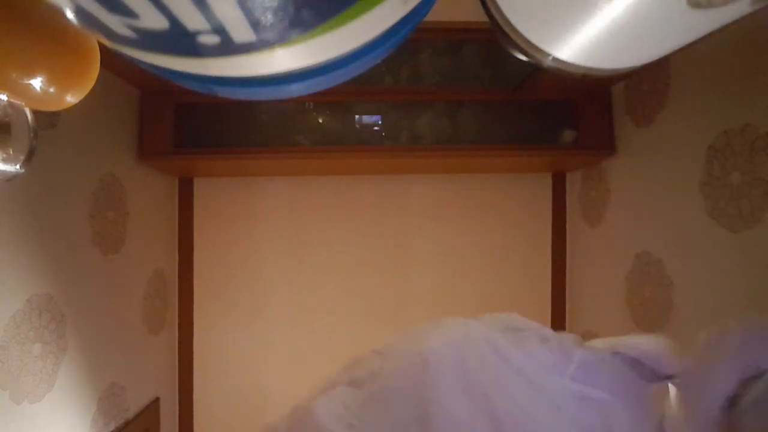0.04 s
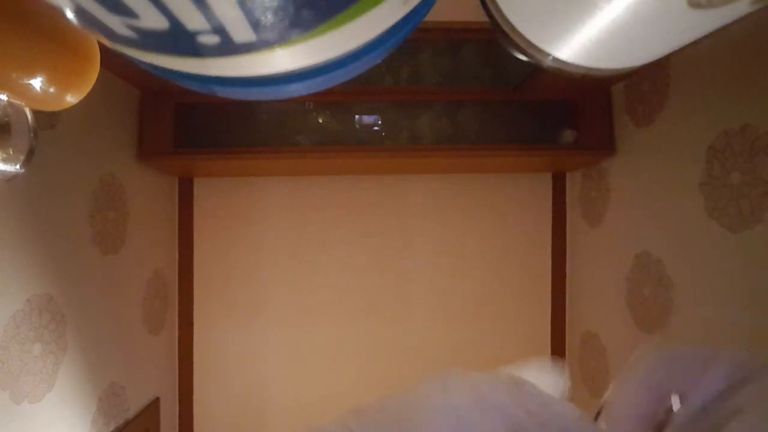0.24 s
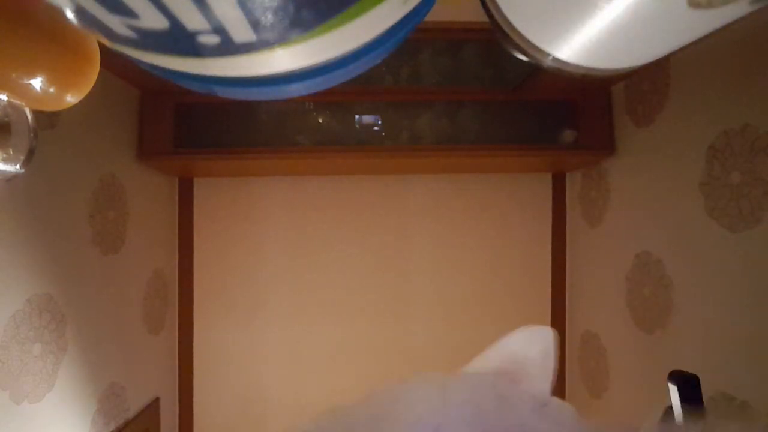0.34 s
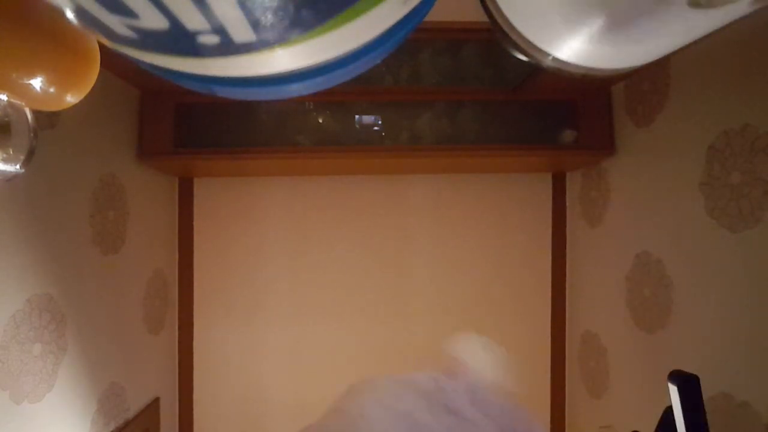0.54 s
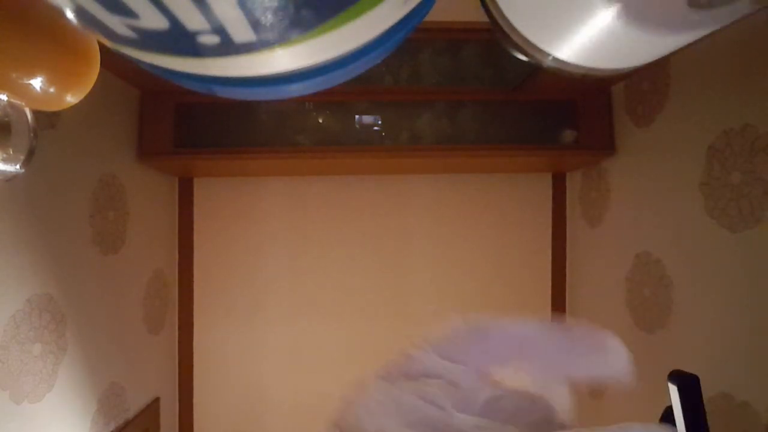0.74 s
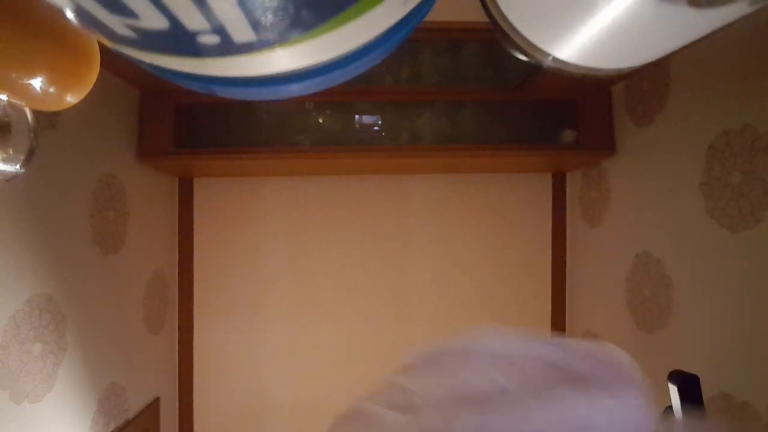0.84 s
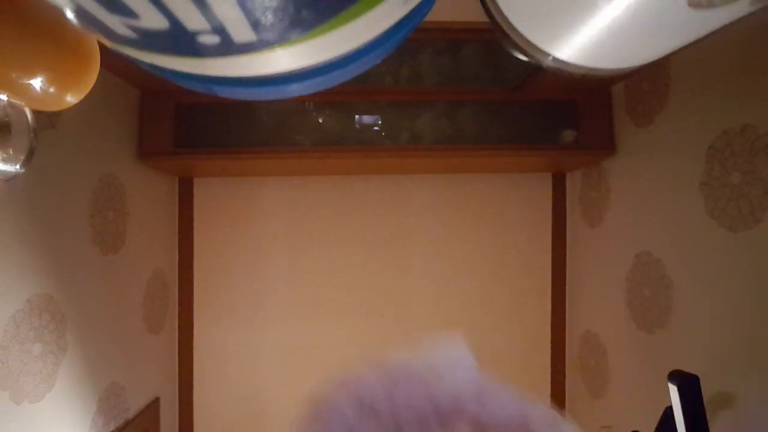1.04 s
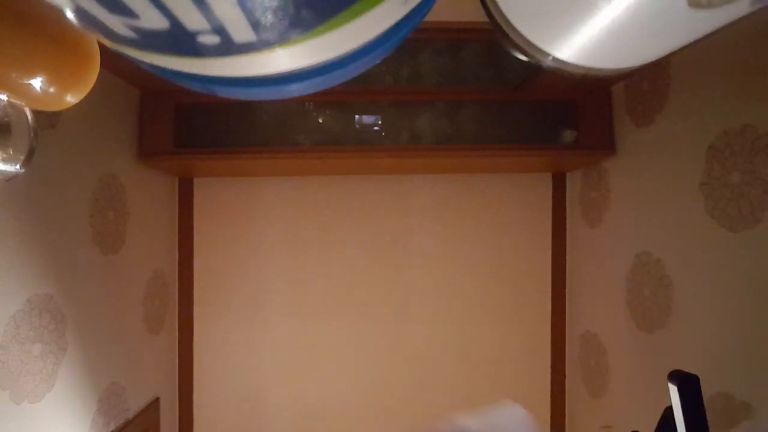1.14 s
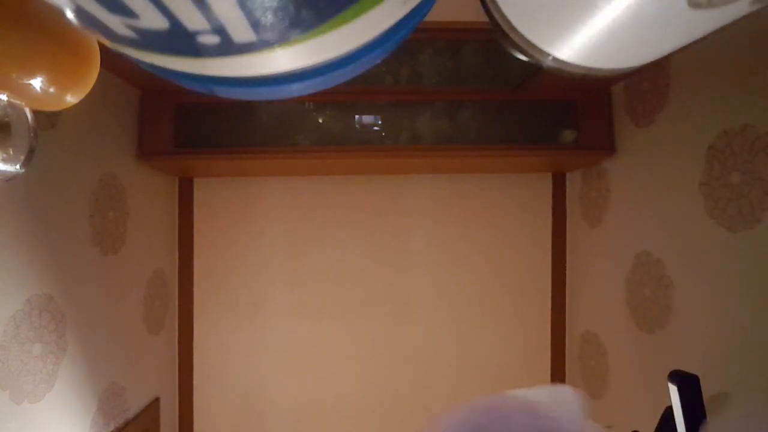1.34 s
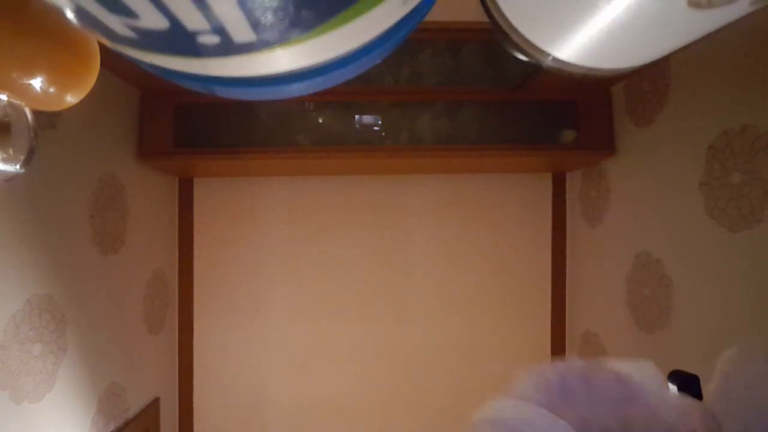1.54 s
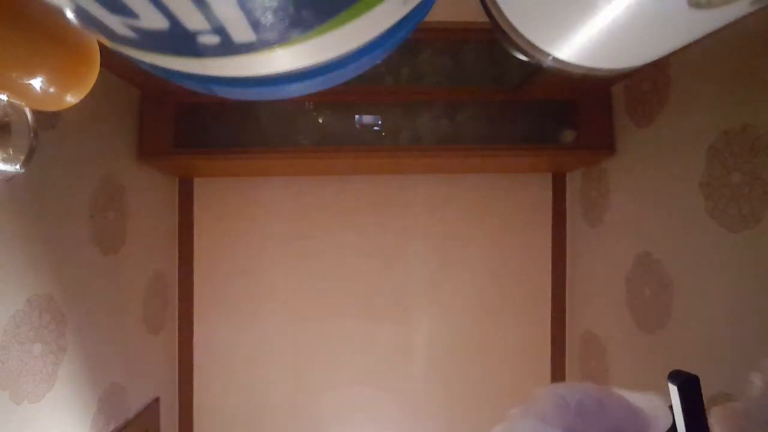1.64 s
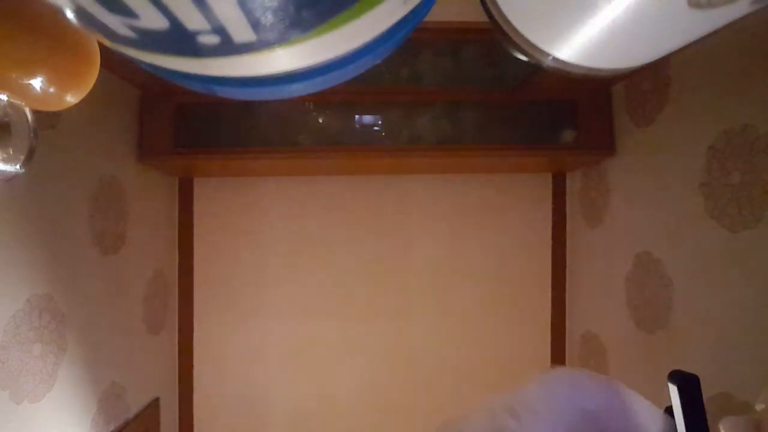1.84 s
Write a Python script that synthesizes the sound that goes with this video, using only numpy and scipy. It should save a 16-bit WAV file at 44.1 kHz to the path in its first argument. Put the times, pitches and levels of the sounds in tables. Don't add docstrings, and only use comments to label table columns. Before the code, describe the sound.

Gloved fingers twist a thread until it snaps, ticking and rustling softly in a quiet room

```python
import sys
import numpy as np
from scipy import signal
from scipy.fft import rfft, irfft
from scipy.io import wavfile
from scipy.ndimage import uniform_filter1d

SR = 44100
rng = np.random.default_rng(int(sys.argv[2]) if len(sys.argv) > 2 else 0)


def boost(x):
    u = np.asarray(x, float) / 20
    return 10 ** u


def file_out(sig):
    cols = np.atleast_2d(sig).T
    lim = np.clip(cols, -1, 1)
    pcm = np.round(lim * 32767).astype(np.int16)
    wavfile.write(sys.argv[1], SR, pcm)


N = 83790
TREBLE_HZ = 9000


def band(x, hz, q):
    return signal.lfilter(*signal.iirpeak(min(hz, .44 * SR), max(q, .3), SR), x)


def twice(x, hz, q):
    return band(band(x, hz, q), hz, q)


def unit(x):
    return x / np.sqrt(np.mean(x ** 2))


def peak(x):
    return x / np.abs(x[0]).max()


def tone(x, points):
    hz, db = np.array(points).T
    f = np.arange(N // 2 + 1) * SR / N + 1
    gain = boost(np.interp(np.log(f), np.log(hz), db))
    return irfft(rfft(x) * gain, N)


def add(out, s, x):
    i = int(s * SR)
    out[:, i:i + x.shape[1]] += x[:, :N - i]


def ports(shared, own, pan_db):
    own = 0.35 * signal.lfilter(*signal.butter(1, 1500, "high", fs=SR), own)
    pan = boost(np.array([[pan_db], [-pan_db]]) / 2)
    return np.array([shared + own, shared - own]) * pan


def lag(size, s):
    hz = np.minimum(np.arange(size // 2 + 1) * SR / size, 3500)
    return np.exp(-2j * np.pi * hz * s)


def flicker(rate):
    k = int(SR / rate)
    held = np.repeat(rng.standard_normal(N // k + 1), k)
    return uniform_filter1d(held, k)[:N]


# (pitch [Hz], level per Hz [dB])
ROOM_TONE = [
    (25, -36),
    (60, 24),
    (200, 14.5),
    (600, 5.5),
    (2500, 9.5),
    (5000, 6.5),
    (9000, -29),
    (15000, -71),
]


def room():
    mid, side = tone(rng.standard_normal((2, N)), ROOM_TONE)
    side = side - 0.37 * signal.lfilter(*signal.butter(1, 910, fs=SR), side)
    both = np.array([1.05 * (mid + side), mid - side])
    return unit(both) * boost(-66.5 + 1.5 * flicker(9))


def niche(x):
    t = np.arange(8192) / SR
    noise = rng.standard_normal((2, 2, len(t)))

    def fade(t60, start):
        return (t > start) * boost(-60 * (t - start) / t60)

    echo = noise[0] * fade(t60=.025, start=.005)
    tail = band(noise[1], 2200, .4) * fade(t60=.09, start=.0009)
    answer = (boost(-18) * unit(echo) + boost(-15) * unit(tail)) / np.sqrt(len(t))
    return signal.fftconvolve(x, answer, axes=1)[:, :N]


def grains():
    clicks_per_s, spread_db, cap_db = 3500, 7, 10
    chance, sign, size = rng.random((3, 2, N))
    level_db = np.minimum(-spread_db * np.log(size + 1e-4), cap_db)
    return unit((chance < clicks_per_s / SR) * np.sign(sign - .5) * boost(level_db))


# (time [s], level [dB])
SLIDE_LEVEL = [(0, -65.5), (.09, -67), (0.148, -61.5), (.34, -65.5), (.38, -68.5), (.5, -67.5),
               (0.611, -74), (.68, -62.5), (.79, -64.5), (.84, -69), (.93, -55.5), (0.954, -55.5),
               (1, -71.5), (1.17, -70), (1.24, -70), (1.3, -74), (1.4, -71), (1.44, -66), (1.72, -62.5),
               (1.9, -66.5)]
# (pitch [Hz], level per Hz [dB])
SLIDE_COLOUR = [
    (200, 2),
    (500, 2),
    (2500, -2),
    (4500, -6),
    (9000, -9),
    (15000, -9.5),
]


def slide():
    x = tone(0.57 * grains() + rng.standard_normal((2, N)), SLIDE_COLOUR)
    high = signal.sosfilt(signal.butter(2, 5000, "high", fs=SR, output="sos"), x)
    low = signal.sosfilt(signal.butter(2, 4500, fs=SR, output="sos"), x)
    low = low * boost(2.28 * flicker(65.18))
    low = np.array([low[0] + .5 * low[1], 0.59 * (low[0] - .5 * low[1])])
    grip_db = np.interp(np.arange(N) / SR, *np.array(SLIDE_LEVEL).T)
    return (low - high) / np.std(high) * boost(grip_db + 2 + 1.6 * flicker(25))


# (time [s], peak level [dB], pitch [Hz])
KNUCKLES = [(0.038, -46, 175), (0.206, -37, 216), (0.31, -49.5, 129), (0.483, -52.5, 117),
            (0.697, -55, 148), (0.867, -48.5, 151), (0.901, -64, 110), (0.96, -73, 86), (1.224, -59, 195),
            (1.311, -50.5, 340), (1.35, -47, 174), (1.496, -40, 224), (1.518, -44, 117), (1.628, -46, 184),
            (1.717, -48, 178)]


def thuds():
    out, t = np.zeros((2, N)), np.arange(4096) / SR
    for s, db, hz in KNUCKLES:
        u = t * hz / 1.08
        swell = u * np.exp(1 - u) * np.exp(-u) * 2
        bump = boost(db - 7) * swell * np.sin(2 * np.pi * hz * t)
        add(out, s, bump * np.array([[1], [1]]))
    return out


# (start [s], length [s], level [dB], pitch [Hz])
GLOVE_RUBS = [(0.018, 0.053, -55, 2440), (0.117, 0.051, -58, 1700), (0.259, 0.048, -61.5, 1520),
              (0.31, 0.014, -52.5, 1900), (0.463, 0.062, -59, 2660), (0.205, 0.015, -45.5, 2540),
              (0.688, 0.03, -56, 2470), (0.706, 0.037, -60, 2300), (0.747, 0.03, -56, 2150),
              (0.872, 0.015, -41.5, 3170), (0.893, 0.017, -42.5, 2950), (0.913, 0.023, -53, 1700),
              (0.927, 0.03, -51, 3100), (1.331, 0.044, -64.5, 980), (1.429, 0.037, -60, 1700),
              (1.497, 0.018, -50, 1400), (1.545, 0.14, -63.5, 1080), (1.639, 0.018, -54, 1880),
              (1.701, 0.05, -54, 1920)]


def rubs():
    out = np.zeros((2, N))
    crackle = grains() * boost(3.0 * flicker(250))
    for s, length, db, hz in GLOVE_RUBS:
        i, n = int(s * SR), int(length * SR)
        x = crackle[:, i:i + n] * np.sin(np.pi * (np.arange(n) / n) ** .7)
        ring = unit(band(band(x, hz, 0.28), hz, 0.89))
        body = boost(-2.5) * unit(band(x, 640, 0.82))
        crisp = boost(-26) * unit(band(x, TREBLE_HZ, 0.98))
        add(out, s, boost(db - 4) * ports(*(ring + body + crisp), 3))
    return out


# (time [s], peak
# level [dB], pitch [Hz], finger knock [dB], treble [dB])
THREAD_TICKS = [(0.0276, -40, 2700, -18, -14), (0.0382, -30, 3180, -23, -21), (0.0399, -40, 2880, -11, -12),
                (0.0537, -41, 1820, -14, -17), (0.1223, -43, 2020, -16, -13), (0.2093, -28, 3890, -16, -14),
                (0.2116, -25, 2620, -19, -15), (0.2154, -31, 2900, -14, -12), (0.2789, -44, 1720, -17, -15),
                (0.2803, -44, 1260, -9, -12), (0.3108, -35, 2410, -18, -4), (0.314, -42, 2750, -15, -8),
                (0.3155, -38, 1620, -10, -19), (0.3398, -44, 2510, -21, -8), (0.4052, -45, 2150, -21, -17),
                (0.5622, -51, 1660, -10, -11), (0.5903, -46, 1780, -19, -17), (0.6444, -49, 2120, -18, -8),
                (0.6546, -45, 3520, -17, -13), (0.6773, -42, 3050, -9, -15), (0.6981, -32, 2710, -16, -23),
                (0.7015, -36, 2550, -15, -15), (0.7027, -38, 1660, -8, -14), (0.7159, -36, 2230, -21, -19),
                (0.7242, -44, 2210, -13, -13), (0.7688, -43, 2220, -17, -8), (0.7775, -35, 2270, -18, -8),
                (0.7796, -44, 2330, -13, -4),
                (0.8156, -50, 1180, -8, -13), (0.8389, -46, 1160, -10, -10), (0.8522, -42, 1960, -10, -19),
               (0.8682, -20, 2320, -24, -5), (0.8695, -28, 2820, -14, -7), (0.8722, -38, 1780, -9, -7),
               (0.8747, -36, 2500, -19, -14), (0.8764, -36, 2090, -15, -6), (0.8786, -35, 3320, -23, -10),
               (0.8912, -30, 2710, -22, -15), (0.8937, -27, 3050, -22, -6), (0.8956, -35, 2660, -17, -9),
               (0.8989, -33, 3090, -21, -8), (0.9015, -33, 1380, -14, -17), (0.9037, -37, 2270, -10, -13),
               (0.9215, -34, 1520, -10, -10), (0.9283, -36, 2260, -11, -12), (0.9308, -34, 1290, -12, -16),
               (0.9321, -37, 1600, -10, -9), (0.9515, -40, 1610, -19, -8), (1.1207, -51, 1450, -13, -14),
               (1.1238, -49, 1480, -18, -14), (1.1537, -49, 2350, -14, -14), (1.1898, -43, 1820, -18, -15),
               (1.247, -47, 1990, -9, -19), (1.2524, -51, 1390, -10, -14), (1.2724, -48, 2670, -16, -14),
               (1.2871, -44, 1070, -7, -27), (1.3507, -48, 1340, -11, -18), (1.3601, -48, 1820, -11, -18),
               (1.3874, -50, 2130, -12, -17),
                (1.4376, -41, 1680, -8.5, -10), (1.451, -45, 1770, -10, -20), (1.4786, -44, 1900, -23, -19),
               (1.5028, -46, 1470, -2, -3), (1.5055, -53, 2020, -3, -9), (1.5057, -39.5, 1880, -12, -13),
               (1.5289, -38, 2380, -11, -18), (1.5461, -40, 2020, -15, -22), (1.574, -44, 1960, -14, -12),
               (1.5845, -45, 1920, -17, -14), (1.5869, -40.5, 1020, -4, -14), (1.6062, -48, 2080, -18, -12),
               (1.6212, -34.5, 1530, -5, -18), (1.623, -51, 1510, 10, -10),
               (1.6436, -27.5, 2070, -18.5, -27), (1.6473, -45, 1420, -29, -18),
               (1.6829, -47, 1410, -15, -12), (1.718, -40, 1250, -24, -18), (1.7249, -39, 2420, -13, -2),
               (1.786, -37, 2030, -30, -20), (1.819, -44.5, 2030, -18, -15), (1.8371, -41, 1890, -24, -20),
               (1.8697, -43, 2300, -32, -13)]
CRACK_EDGES = [
    (.3108, -38, 4300, -20, 5),
    (.8678, -27, 4200, -25, -6),
    (.8686, -30, 1150, -12, -20),
    (.8689, -27, 4300, -25, -8),
]
# (time [s], left over right [dB], extra left lag [ms])
HAND_PLACE = [(0, 3, 0), (.35, 3, -.1), (.58, 4, .04), (.7, 3, -.08), (.868, 8, -.15), (.885, 0, 0),
              (.95, 3, 0), (1.12, 4, -.13), (1.29, 5, -.12), (1.36, 5, 0), (1.9, 4, .02)]


def thread():
    out, t = np.zeros((2, N)), np.arange(512) / SR
    lead = 16
    when, pan_db, lag_ms = np.array(HAND_PLACE).T
    for s, db, hz, knock_db, treble_db in THREAD_TICKS + CRACK_EDGES:
        crumble = .12 * rng.standard_normal((2, len(t))) * np.exp(-t / .0004)
        crack = crumble - (t == 0) * np.array([[1], [0]])
        ring = twice(crack, hz, 1.25)
        ring = peak(ring)
        knock = boost(knock_db + 2) * peak(twice(crack, 620, 0.95))
        treble = boost(treble_db - 4) * peak(twice(crack, TREBLE_HZ, .8))
        x = ring + knock + treble
        left, right = np.roll(ports(*x, np.interp(s, when, pan_db)), lead, axis=1)
        late = lag(512, np.interp(s, when, lag_ms) / 1000)
        tick = np.array([irfft(rfft(left) * late), right])
        start = s - (lead + np.abs(ring[0]).argmax()) / SR
        add(out, start, boost(db) * tick)
    return out


# (pitch [Hz], peak level [dB], t60 [s], delay [s])
SNAP_RINGS = [
    (618, -42, 0.042, 0.000092),
    (1100, -16.5, 0.0046, 0.000087),
    (1700, -27, 0.009, 0.00021),
    (2720, -11.5, 0.0052, 0.00043),
    (4090, -8.5, 0.0041, 0.000695),
    (5820, -17.5, 0.0029, 0.000347),
    (7800, -18.5, 0.0019, 0.00071),
    (10650, -21.5, 0.002, 0.00052),
    (13500, -28, 0.0041, 0.00051),
]


def snap():
    out, x = np.zeros((2, N)), 0
    for hz, db, t60, delay in SNAP_RINGS:
        t = np.maximum(np.arange(2048) / SR - delay, 0)
        phase = 2 * np.pi * hz * t + np.array([[0], [1]]) * rng.uniform(0, 6.5)
        rise = np.minimum(t / 0.00018, 1)
        x = x - boost(db - 60 * t / t60) * rise * np.sin(phase)
    x = signal.lfilter(*signal.butter(2, 300, "high", fs=SR), x)
    add(out, .2053, ports(*x, 0.5))
    return out


def scene():
    near = thread() + rubs() + snap()
    left = irfft(rfft(near[0]) * lag(N, .00005), N)
    direct = np.array([left, near[1]])
    return direct + niche(near) + thuds() + slide() + room()


def roll_off(x):
    return signal.sosfilt(signal.butter(12, 16800, fs=SR, output="sos"), x)


def record(dry):
    dips = .3 * band(dry, 6200, 3) + .35 * band(dry, 10300, 9.3)
    whistle = 1.1 * band(dry, 8450, 5.5)
    f = np.arange(N // 2 + 1) * SR / N
    trim = np.where(f > 15600, boost(-30), 1) * f / np.hypot(f, 30)
    x = irfft(rfft(dry - dips + whistle) * trim, N)
    return roll_off(x - .0005)


dry = scene()
out = record(dry)
file_out(out)
```